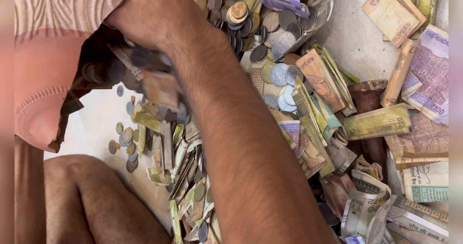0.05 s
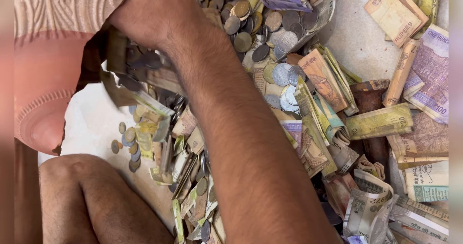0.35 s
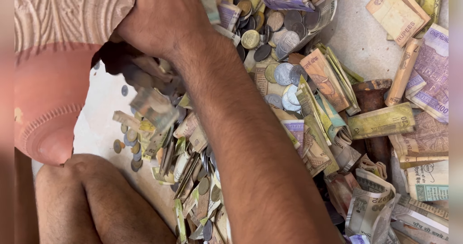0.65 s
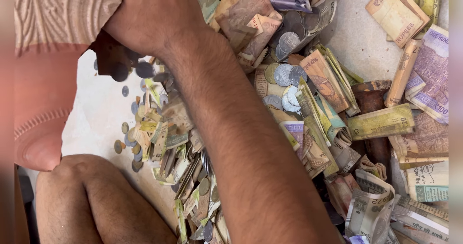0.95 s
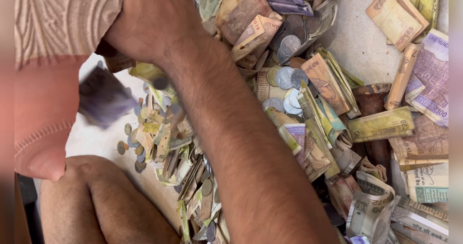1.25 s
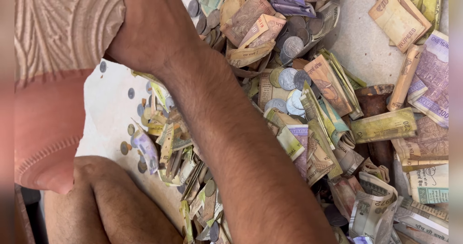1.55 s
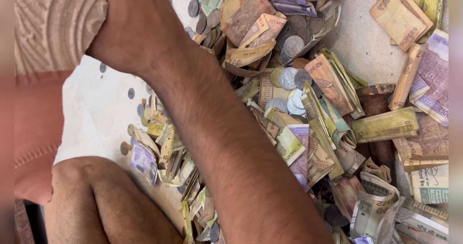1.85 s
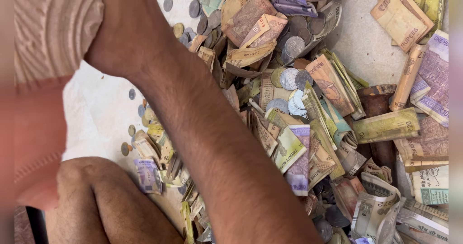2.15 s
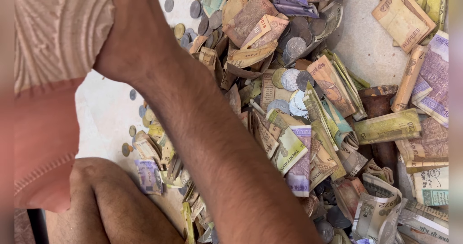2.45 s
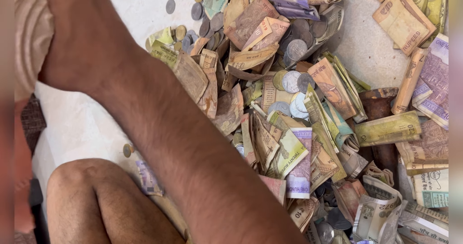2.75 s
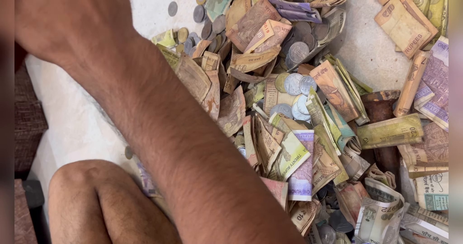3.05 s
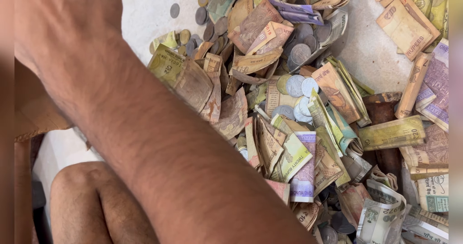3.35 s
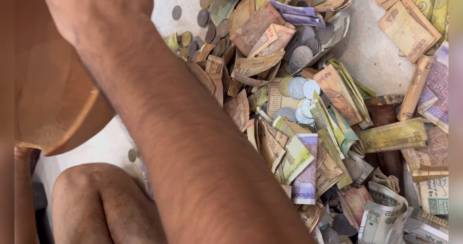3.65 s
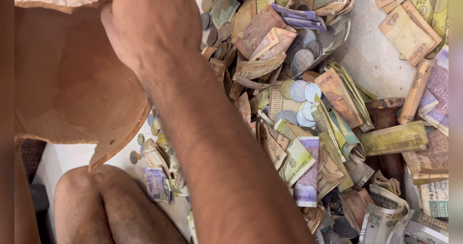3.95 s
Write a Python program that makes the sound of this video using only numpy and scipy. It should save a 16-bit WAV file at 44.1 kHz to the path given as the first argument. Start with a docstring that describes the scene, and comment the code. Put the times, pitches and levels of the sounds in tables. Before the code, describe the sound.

Close up in a quiet room, coins slide out of a clay pot and clatter brightly onto a pile. After a final sharp clink come faint paper rustles, a few coin ticks and soft, hollow bumps.

```python
"""A quiet room with a hard floor: coins and folded banknotes are tipped from a broken clay pot, close up.
The coins scrape over the clay, ring the rim and clatter onto a heap while wads of notes flop down.
The stream thins to single ringing clinks and one last coin. Then the notes rustle faintly,
a few coins settle and the empty pot is turned over with soft, hollow bumps."""
import sys
import numpy as np
from scipy import signal
from scipy.fft import rfft, irfft, next_fast_len
from scipy.io import wavfile
from scipy.ndimage import uniform_filter1d, map_coordinates

SR = 44100
rng = np.random.default_rng(int(sys.argv[2]) if len(sys.argv) > 2 else 0)


def dump(signal):
    """Clip the signal to [-1, 1] and save it as 16-bit WAV at the path in sys.argv[1]."""
    limited = np.clip(np.atleast_2d(signal).T, -1, 1)
    pcm = np.round(limited * 32767).astype(np.int16)
    wavfile.write(sys.argv[1], SR, pcm)


N = 176400
TIME_S = np.arange(N) / SR
TOP_HZ, RING_ATTACK_S = 15850, 0.0013


def amp(db):
    """Decibels to gain."""
    return 10 ** (np.asarray(db) / 20)


def unit(x):
    """Scale to rms 1."""
    return x / np.sqrt(np.mean(x ** 2) + 1e-20)


def along(points, hz):
    """Interpolate (freq_hz, value) points on a log axis."""
    freqs_hz, values = np.transpose(points)
    return np.interp(np.log(hz + 1), np.log(freqs_hz + 1), values)


def envelope(points):
    """Gain from (time_s, level_db) points, silent after the last."""
    time_s, db = np.transpose(points)
    return amp(np.interp(TIME_S, time_s, db, right=-np.inf))


def swell(centre_s, sigma_s):
    """Gaussian envelope."""
    return np.exp(-.5 * ((TIME_S - centre_s) / sigma_s) ** 2)


def lowpass(hz, top_hz):
    """Gain of a steep low-pass with a rounded edge."""
    return .5 - .5 * np.tanh((hz - top_hz) / 60)


def filtered(x, response):
    """Apply a frequency response."""
    size = next_fast_len(N + SR // 2)
    return irfft(rfft(x, size) * response(np.fft.rfftfreq(size, 1 / SR)), size)[..., :N]


def coloured(x, spectrum):
    """Shape the spectrum, keeping the power of white noise."""
    return filtered(x, lambda hz: unit(amp(along(spectrum, hz)) * lowpass(hz, TOP_HZ + 200)))


def resonance(x, centre_hz, width_hz):
    """Steep-sided resonance, keeping the power of white noise."""
    def response(hz):
        damping = 1j * hz * width_hz
        return unit(np.abs(damping / (centre_hz ** 2 - hz ** 2 + damping)) ** 2)
    return filtered(x, response)


def widened(pair, coherence):
    """Blend two independent signals into left and right of given coherence."""
    def weights(hz):
        angle = np.arccos(along(coherence, hz)) / 2
        return np.array([np.cos(angle), np.sin(angle)])
    mid, side = filtered(pair, weights)
    return np.array([mid + side, mid - side])


def add(track, start_s, sound):
    """Mix a sound into a track."""
    part = track[round(start_s * SR):][:len(sound)]
    part += sound[:len(part)]


def burst(t60_s, attack_s=.0004):
    """Decaying noise of one contact."""
    t = np.arange(SR // 8) / SR
    return rng.standard_normal(len(t)) * amp(-60 * t / t60_s) * (1 - np.exp(-t / attack_s))


def shower(grains, spread_db):
    """Scatter grains of random level over the first half of the scene, at even power."""
    count, size = grains.shape
    starts = ((rng.permutation(count) + rng.random(count)) / count * (N // 2)).astype(int)
    scaled = grains * amp(spread_db * np.clip(rng.standard_normal((count, 1)), -2, 2))
    mix = unit(np.bincount((starts[:, None] + np.arange(size)).ravel(), scaled.ravel(), N))
    power = uniform_filter1d(uniform_filter1d(mix ** 2, size=900), size=600)
    return mix / np.sqrt(np.abs(power) + 1e-3)


def contacts(t60_s, spread_db, band_hz, count):
    """Shower of clacks, five random modes each."""
    t = np.arange(SR // 45) / SR
    modes_hz = rng.uniform(*band_hz, (count, 5)).T[:, :, None]
    rings = sum(np.sin(2 * np.pi * hz * t) for hz in modes_hz)
    return shower(rings * amp(-60 * t / t60_s), spread_db)


# room noise: freq_hz, gain_db
AIR_SPECTRUM = [(20, -34), (32, -16.5), (48, -7), (80, -5), (120, -4), (170, 0), (250, -8), (310, -5),
                (430, -4), (560, -11.5), (900, -8.5), (1600, -17), (2600, -21), (4500, -22.5), (5600, -30),
                (6600, -37.5), (9000, -44), (13000, -46.5), (14200, -55)]
# left-right likeness: freq_hz, coherence
AIR_COHERENCE = [(50, 0.65), (250, 1), (500, 0.55), (1000, 0.13), (2000, 0.064), (4000, .2), (5000, 0.41),
                 (5600, 0.97), (12000, 1)]


def room_noise(level_db=-44, pan_db=0.5, top_hz=14500):
    """Steady noise, slightly stronger on the left."""
    noise = coloured(widened(rng.standard_normal((2, N)), AIR_COHERENCE), AIR_SPECTRUM)
    noise = unit(filtered(noise, lambda hz: lowpass(hz, top_hz)))
    return noise * amp([[level_db + pan_db], [level_db - pan_db]])


# money sliding on clay: time_s, level_db
SLIDE_LEVEL = [(0.0, -33), (0.186, -39.5), (0.202, -31.5), (0.388, -37.5), (0.478, -40.5), (0.592, -36.5),
               (0.684, -41), (0.724, -38.5), (0.892, -46), (0.91, -41), (0.948, -46), (0.968, -48),
               (1.04, -50), (1.17, -41.5), (1.21, -44), (1.27, -46), (1.312, -38.5), (1.34, -48),
               (1.43, -58), (1.46, -46.5), (1.498, -48), (1.52, -81)]
# coin on clay: freq_hz, gain_db
SCRAPE_SPECTRUM = [(200, -28), (500, -6.5), (900, -5.5), (1400, -13.5), (2000, 1), (2700, 8.5), (3600, 7),
                   (4900, 10), (5400, -2.5), (5900, -43)]
# full pot: centre_hz, width_hz, gain_db
POT_RESONANCES = [(1377, 660, -4), (1642, 90, -12.5), (2600, 190, -15)]
# left-right likeness of the wide pot: freq_hz, coherence
POT_COHERENCE = [(500, .5), (1500, 0.53), (2000, 0.13), (2400, 0.12), (5000, 0.053)]


def pot_scrape(gain_db=-4, body_fade_db_per_s=5.5):
    """Contacts all over the clay ring the body of the pot."""
    grit = [contacts(t60_s=0.028, spread_db=3, band_hz=(500, 5600), count=750) for _ in range(2)]
    drive = amp(gain_db) * envelope(SLIDE_LEVEL) * widened(np.array(grit), POT_COHERENCE)
    body = sum(amp(db) * resonance(drive, hz, width_hz) for hz, width_hz, db in POT_RESONANCES)
    return coloured(drive, SCRAPE_SPECTRUM) + body * amp(-body_fade_db_per_s * TIME_S)


# coins landing: time_s, level_db
FLOW_LEVEL = [(0, -19), (.064, -21), (.185, -24.5), (.216, -16), (.248, -23), (.4, -24.5), (.42, -26),
              (.47, -24.5), (.56, -26), (.597, -26.5), (.645, -27), (.665, -31), (.69, -25), (.736, -25),
              (.8, -26), (.854, -28.5), (.868, -27), (.893, -33), (.908, -24.5), (.945, -39), (.97, -25),
              (.994, -31.5), (1.02, -32.5), (1.04, -39.5), (1.07, -40), (1.077, -34), (1.112, -24),
              (1.136, -37), (1.18, -27), (1.2, -29.5), (1.238, -28.5), (1.28, -34.5), (1.3, -38),
              (1.37, -45.5), (1.47, -45), (1.52, -50)]
# coin on coin: freq_hz, gain_db
CLICK_SPECTRUM = [(1500, -31), (4000, -6), (6000, -2), (8000, 1), (10000, 2), (11800, 3.5), (13300, -3),
                  (14600, 3.5), (15600, -2)]
# coin sizes: pitch_hz, spread_hz, level_db
COIN_SIZES = [(9310, 350, 0), (12100, 360, 1), (11650, 260, 3), (11260, 400, 5), (13100, 600, -8),
              (15600, 160, -2.5)]


def coin_stream(click_db=-4, jingle_db=-3, ring_count=1100, median_t60_s=.042):
    """Coins land on coins, click and ring until the heap damps them."""
    clicks = contacts(t60_s=0.0153, spread_db=2.5, band_hz=(3000, 16000), count=2200)
    clicks = coloured(clicks, CLICK_SPECTRUM)
    t = np.arange(SR // 16) / SR
    hz, spread_hz, db = np.array(COIN_SIZES)[np.arange(ring_count) % len(COIN_SIZES)].T[:, :, None]
    detune, life = rng.standard_normal((2, ring_count, 1))
    t60_s = median_t60_s * np.exp(.5 * life)
    rings = amp(db - 60 * t / t60_s) * np.sin(2 * np.pi * (hz + spread_hz * detune) * t)
    jingle = shower(rings, spread_db=5.5)
    return envelope(FLOW_LEVEL) * (amp(click_db) * clicks + amp(jingle_db) * jingle)


# hard landings: start_s, level_db
COIN_STRIKES = [(.002, -15), (0.028, -14), (0.069, -17), (0.205, -16.5), (0.215, -17), (0.3763, -20),
                (0.403, -14.5), (0.513, -19), (0.541, -18), (0.593, -22), (0.638, -15), (0.7806, -17),
                (0.8255, -21), (0.863, -19.5), (.8989, -19), (0.905, -18.5), (0.959, -20), (0.969, -19.5),
                (1.019, -26), (1.074, -29), (1.147, -19.5), (1.155, -17), (1.174, -16), (1.247, -28),
                (1.2795, -22), (1.3065, -21.5), (1.4856, -36), (1.4916, -18.5)]


def coin_strikes(t60_s=0.022, rebound_s=0.0042, rebound_db=-4):
    """A coin lands on one edge, then slaps down with the other."""
    out = np.zeros(N)
    for start_s, db in COIN_STRIKES:
        add(out, start_s, amp(db) * burst(t60_s))
        add(out, start_s + rebound_s, amp(db + rebound_db) * burst(t60_s))
    return coloured(out, CLICK_SPECTRUM)


# freely ringing coins: start_s, pitch_hz, level_db, t60_s
COIN_CLINKS = [(.016, 12600, -20, 0.078), (.105, 9500, -17, .08), (.11, 15600, -20.5, 0.12),
               (.165, 14000, -15, .06), (0.25, 12400, -17.5, .08), (.3, 11830, -14, .12),
               (0.376, 11700, -12, 0.042), (.445, 11830, -19.5, .1), (0.467, 11670, -19.5, 0.16),
               (0.512, 11900, -16, 0.082), (.53, 12300, -16.5, 0.039), (.575, 11400, -20, 0.31),
               (.589, 12000, -19, 0.071), (0.601, 9000, -20, 0.17), (.627, 12300, -16, 0.11),
               (.68, 11550, -23, 0.14), (.715, 8750, -22, 0.21), (.738, 9100, -12.5, 0.087),
               (0.738, 11540, -16, 0.11), (0.7793, 14500, -9, 0.07), (0.7806, 12060, -18, 0.15),
               (.795, 11250, -28, 0.31), (0.8615, 11676, -14, 0.13), (0.9005, 11300, -18, 0.15),
               (0.9573, 11850, -16, 0.11), (.9697, 11460, -18, 0.065), (.995, 11770, -24.5, 0.24),
               (1.079, 11900, -25, 0.25), (1.11, 11300, -16, 0.057), (1.1548, 14268, -17, 0.097),
               (1.174, 14200, -4.5, 0.055), (1.1753, 12700, -22.5, 0.36), (1.176, 11750, -23, 0.32),
               (1.209, 14100, -18, 0.08), (1.223, 8500, -25, 0.043), (1.249, 9620, -19.5, 0.17),
               (1.248, 14946, -24, 0.12), (1.257, 11560, -22, 0.32), (1.279, 15100, -17, 0.054),
               (1.3044, 11750, -23, 0.23), (1.318, 14060, -23, 0.23), (1.337, 9530, -34, 0.16),
               (1.359, 11620, -26, 0.31), (1.4907, 11660, -14.5, 0.11), (1.4915, 14100, -18, 0.12),
               (1.4915, 10990, -31.5, 0.29)]


def coin_clinks(nominal_split_hz=129.6, twin_db=-8.5, rocks_per_s=160):
    """A free coin rings in two close modes and flutters as it rocks."""
    out, t = np.zeros(N), np.arange(SR // 3) / SR
    attack = 1 - np.exp(-t / RING_ATTACK_S)
    flutter_depth = 2.5 * (1.5 - np.exp(-t * rocks_per_s / 2))
    for start_s, hz, db, t60_s in COIN_CLINKS:
        twin_hz = hz + nominal_split_hz * rng.uniform(0.45, 1.5)
        pair = np.sin(2 * np.pi * hz * t) + amp(twin_db) * np.sin(2 * np.pi * twin_hz * t)
        rocking = map_coordinates(rng.uniform(-2.5, 0.57, rocks_per_s), [t * rocks_per_s])
        add(out, start_s, pair * attack * amp(db + flutter_depth * rocking - 60 * t / t60_s))
    return out


# knocks on the clay: start_s, pitch_hz, level_db
CLAY_TAPS = [(0.0502, 1600, -24), (0.1978, 2830, -27.5), (0.2177, 2290, -26), (0.2501, 2990, -24.5),
             (0.3005, 1493, -27.5), (0.3928, 3990, -21), (.404, 1660, -29.5), (.541, 4460, -29.5),
             (0.6363, 4060, -26.5), (0.7224, 1920, -37.5), (0.904, 3740, -33.5), (1.0745, 3440, -33.5),
             (1.1738, 3770, -29.5), (1.1832, 2890, -34.5), (1.2461, 4280, -30.5), (1.291, 1670, -40),
             (1.3096, 1880, -32), (1.4922, 1710, -42.5)]


def clay_taps(t60_s=0.024, log_spread=0.361, mode_count=9):
    """A coin hitting clay excites a cluster of short modes."""
    out, t = np.zeros((2, N)), np.arange(SR // 10) / SR
    taper = np.hanning(mode_count + 2)[1:-1, None]
    for start_s, pitch_hz, db in CLAY_TAPS:
        for side in out:
            offsets = np.linspace(-1, 1, mode_count) + rng.normal(0, .1, mode_count)
            modes_hz = pitch_hz * np.exp(log_spread * offsets)[:, None]
            modes = taper * rng.choice([-1, 1], (mode_count, 1)) * np.sin(2 * np.pi * modes_hz * t)
            add(side, start_s, modes.sum(0) * amp(db - 60 * t / t60_s))
    return widened(out, POT_COHERENCE)


# coins tripping over the rim: start_s, pitch_hz, level_db
RIM_HITS = [(0.1986, 2580, -28.5), (0.2157, 2710, -22), (.25, 2720, -29), (0.316, 2740, -38),
            (.356, 2620, -32), (.4004, 2640, -31.5), (.5191, 2640, -33.5), (0.556, 2570, -26.5),
            (0.5774, 2600, -23), (0.5987, 2710, -23), (0.7263, 2690, -22), (.741, 2710, -35.5),
            (0.759, 2670, -32), (.7785, 2610, -27), (0.796, 2670, -40), (0.8112, 2600, -28.5),
            (0.832, 2540, -32), (.872, 2620, -37), (0.91, 2560, -32.5), (1.1642, 2540, -30),
            (1.184, 2720, -35.5), (1.463, 2470, -39)]


def rim_rings(t60_s=.09, scatter_rad=0.95):
    """The broken rim rings at the pitch of the spot hit."""
    out, t = np.zeros((2, N)), np.arange(SR // 5) / SR
    for start_s, hz, db in RIM_HITS:
        gain = amp(db - 60 * t / t60_s) * (1 - np.exp(-t / RING_ATTACK_S))
        for side, phase in zip(out, rng.normal(0, scatter_rad, 2)):
            add(side, start_s, gain * np.sin(2 * np.pi * hz * t + phase))
    return out


# wads landing: centre_s, sigma_s, level_db
NOTE_FLOPS = [(.76, 0.11, -44.5), (.91, 0.019, -43.5), (.97, 0.01, -49), (1.11, 0.025, -44),
              (1.195, 0.028, -44), (1.295, 0.012, -41.5)]
# wad on heap: freq_hz, gain_db
FLOP_SPECTRUM = [(100, -9), (300, 6), (550, -0.5), (1000, -5), (2500, -3), (5000, -25.5), (8000, -35)]


def note_flops():
    """Wads of notes hit the heap with dull puffs."""
    gain = sum(amp(db) * swell(centre_s, sigma_s) for centre_s, sigma_s, db in NOTE_FLOPS)
    return coloured(rng.standard_normal(N) * gain, FLOP_SPECTRUM)


# dull thumps: centre_s, pitch_hz, level_db, sigma_s
HANDLING_THUMPS = [(0.897, 82.6, -31, 0.011), (0.963, 70, -32, 0.0098), (1.106, 87, -33.5, 0.007),
                   (1.217, 81, -29.5, 0.0085), (1.326, 61, -45.5, 0.028), (3.045, 95.6, -34.5, 0.0098),
                   (3.687, 80, -32.5, 0.013), (3.874, 66.3, -35, 0.019), (3.9, 70, -33, 0.012)]


def handling_thumps(pan_db=1):
    """Handling gives a few low, uneven cycles at a time, slightly to the left."""
    drift = unit(uniform_filter1d(rng.standard_normal(N), size=700))
    phase = uniform_filter1d(drift, size=200)
    out = sum(amp(db) * swell(centre_s, sigma_s) * np.sin(2 * np.pi * hz * (TIME_S - centre_s) + phase)
              for centre_s, hz, db, sigma_s in HANDLING_THUMPS)
    return out * amp([[pan_db], [-pan_db]])


# notes shifting: centre_s, sigma_s, level_db
NOTE_RUSTLES = [(1.84, 0.042, -55.5), (1.915, 0.0078, -54), (1.96, 0.048, -53), (2.06, 0.01, -51),
                (2.095, 0.022, -51), (2.335, 0.031, -53.5), (3.965, 0.021, -59)]
# creases snapping: start_s, level_db
CREASE_SNAPS = [(1.908, -44), (1.962, -46), (2.056, -48), (2.092, -46), (2.333, -43)]
# paper: freq_hz, gain_db
PAPER_SPECTRUM = [(300, -18), (1000, 2.5), (2500, 1.5), (5000, 0.5), (8000, -3), (12000, -6.5),
                  (15000, -13)]


def note_rustle(crinkle_db=3, crease_t60_s=0.039):
    """Settling paper crinkles in short swells and snaps at its creases."""
    crinkle = amp(crinkle_db * unit(uniform_filter1d(rng.standard_normal(N), size=90)))
    gain = sum(amp(db) * swell(centre_s, sigma_s) for centre_s, sigma_s, db in NOTE_RUSTLES)
    paper = unit(crinkle * rng.standard_normal(N)) * gain
    for start_s, db in CREASE_SNAPS:
        add(paper, start_s, amp(db) * burst(crease_t60_s))
    return coloured(paper, PAPER_SPECTRUM)


# coins settling: start_s, level_db
COIN_TICKS = [(2.178, -40.5), (2.342, -39), (2.4543, -51), (2.9413, -56)]


def coin_ticks(t60_s=0.024):
    """A coin settling in the heap ticks without ringing."""
    out = np.zeros(N)
    for start_s, db in COIN_TICKS:
        add(out, start_s, amp(db) * burst(t60_s))
    return coloured(out, CLICK_SPECTRUM)


# blows on the pot: start_s, level_db
POT_BUMPS = [(2.342, -40), (2.521, -32), (2.546, -36)]
# empty pot: pitch_hz, gain_db, t60_s
HOLLOW_MODES = [(236.4, 7.9, 0.08), (289, 8.7, 0.052), (329, 6.8, 0.043), (445, 4.6, 0.077)]


def pot_bumps(attack_s=0.0035):
    """Soft blows sound the hollow of the pot."""
    out, t = np.zeros(N), np.arange(SR // 4) / SR
    ring = sum(amp(db - 60 * t / t60_s) * np.sin(2 * np.pi * hz * t) for hz, db, t60_s in HOLLOW_MODES)
    ring *= 1 - np.exp(-t / attack_s)
    for start_s, db in POT_BUMPS:
        add(out, start_s, amp(db) * ring)
    return out


# room decay: freq_hz, t60_s
REVERB_DECAY = [(200, 0.74), (3000, 0.26), (12000, 0.62)]
# reverb tail level, nearly silent near 5.6 kHz: freq_hz, gain_db
REVERB_SPECTRUM = [(200, -7.5), (1500, -5.5), (4500, -2.5), (5600, -87), (8000, -6), (14000, -29.5)]


def reverb(x):
    """Short diffuse tail, different on each side."""
    hz, t, noise = signal.stft(rng.standard_normal((2, SR // 2)), SR, nperseg=256)
    decay = amp(-60 * t / along(REVERB_DECAY, hz)[:, None])
    tail = signal.istft(noise * decay, SR, nperseg=256)[1]
    wet = signal.fftconvolve(x[None], tail / np.linalg.norm(tail[0]), axes=1)[:, :N]
    return filtered(wet, lambda hz: amp(along(REVERB_SPECTRUM, hz)))


# left microphone port ahead of the right: freq_hz, lead_cycles
LEFT_LEAD = [(100, 0), (2000, 0), (3900, .05), (5900, .5), (8000, 1), (10100, 1.5), (12500, 2),
             (14800, 2.5), (16000, 2.75)]


def scene():
    """The money reaches the left port first; a reverb tail follows."""
    near = coin_stream() + coin_clinks() + coin_strikes() + coin_ticks()
    near += note_rustle() + note_flops() + pot_bumps()
    wide = pot_scrape() + clay_taps() + rim_rings() + room_noise()
    side_sign = np.array([[1], [-1]])
    direct = filtered(near + wide, lambda hz: np.exp(1j * np.pi * along(LEFT_LEAD, hz) * side_sign))
    return direct + reverb(near) + handling_thumps()


def record(dry):
    """Low-pass at the band limit."""
    return filtered(dry, lambda hz: lowpass(hz, TOP_HZ))


dry = scene()
out = record(dry)
dump(out)
```